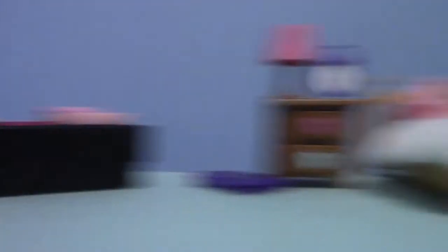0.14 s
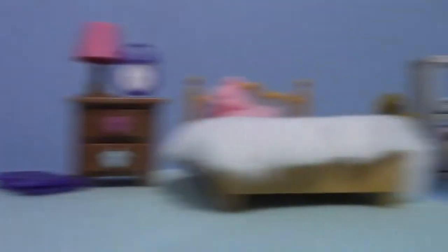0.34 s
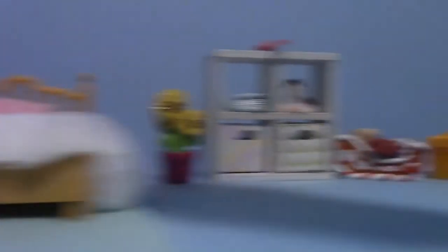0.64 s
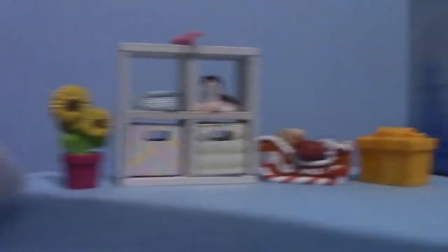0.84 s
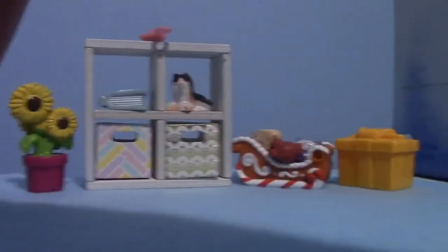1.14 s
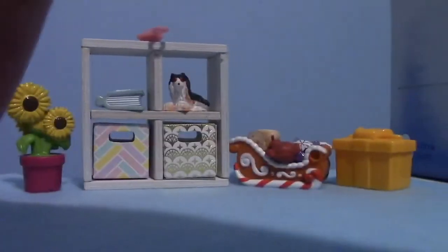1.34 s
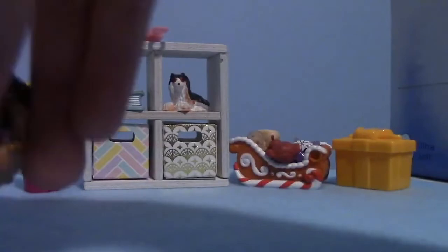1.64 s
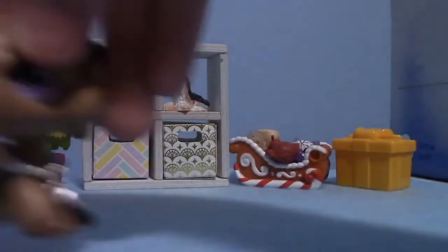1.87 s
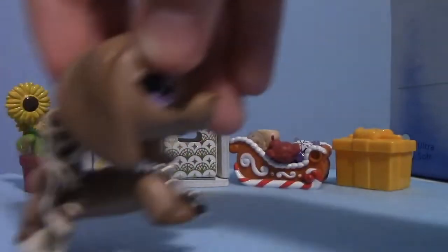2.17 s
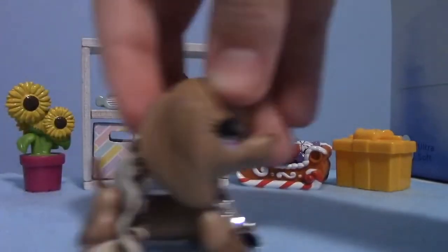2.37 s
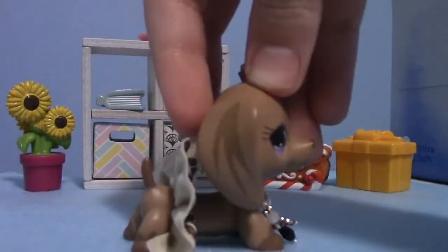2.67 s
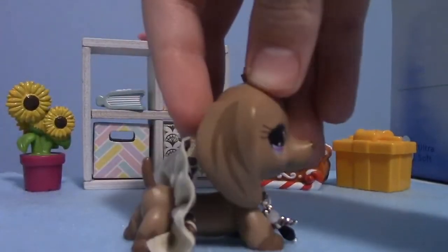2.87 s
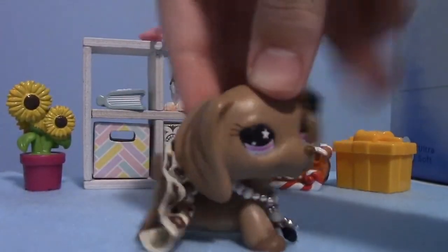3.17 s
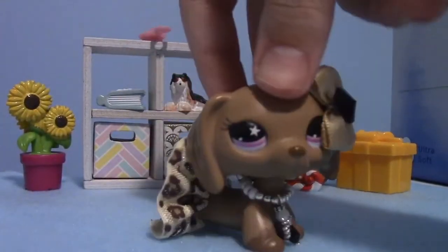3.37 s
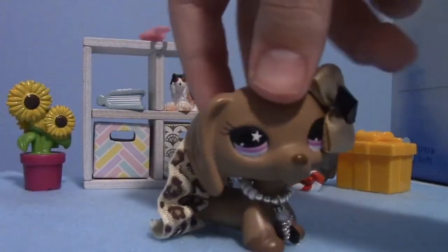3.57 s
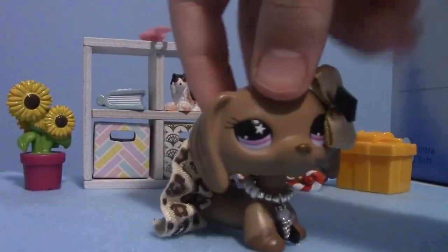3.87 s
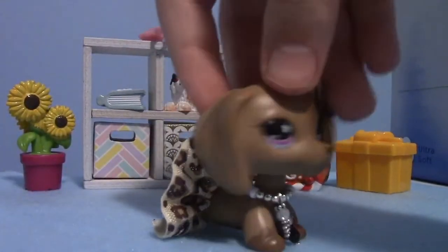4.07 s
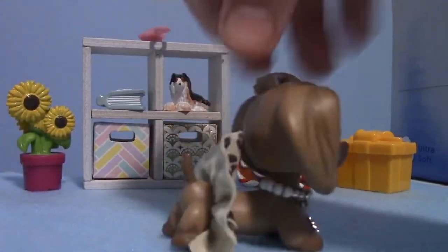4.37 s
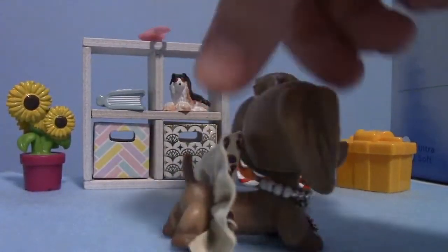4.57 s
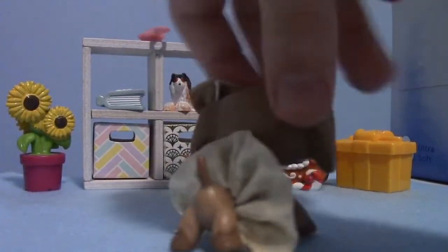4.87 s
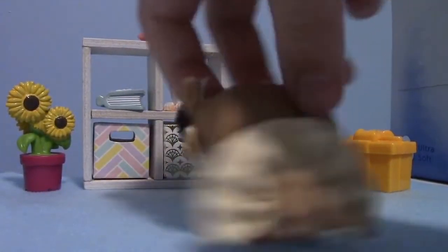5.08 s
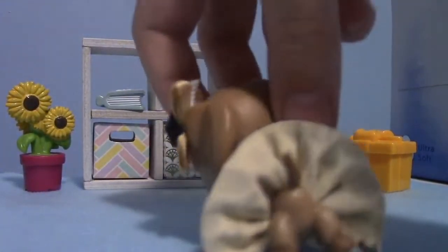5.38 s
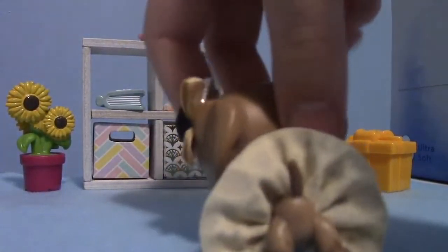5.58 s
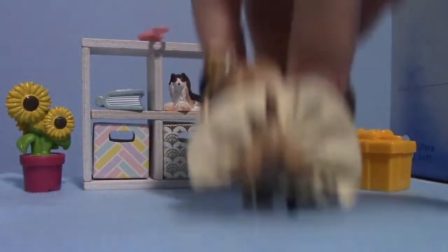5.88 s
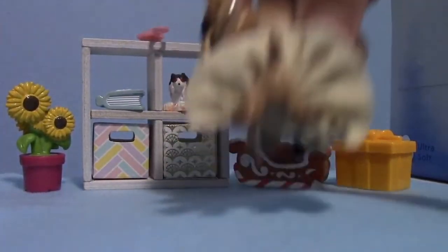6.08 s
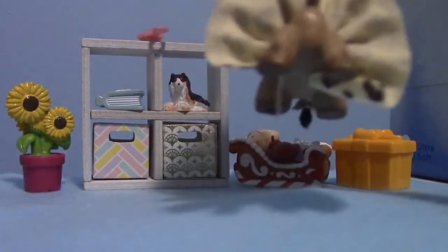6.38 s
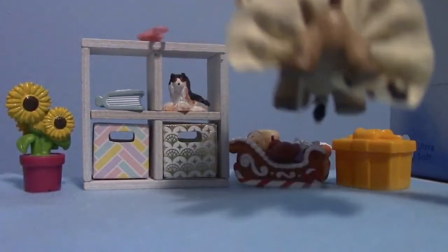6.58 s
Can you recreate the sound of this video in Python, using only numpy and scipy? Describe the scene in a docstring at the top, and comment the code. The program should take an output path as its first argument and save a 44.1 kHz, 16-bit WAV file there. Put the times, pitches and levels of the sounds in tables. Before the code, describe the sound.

Close up in a small, nearly echo-free room, a camera base scrapes along card: a resonant, rough hum with bright hiss, shifting in tone midway, then slowing to rest. Near quiet follows, with faint skin and fabric rubs, tiny bead clicks, and light hollow plastic taps as a toy dog is turned and hopped. Soft room noise and a very thin electronic whine stay behind.

```python
"""Card floor of a toy set in a small room: a small camera is slid across it, droning and hissing.
Then fingers walk a plastic toy dog about: skin and cloth skirt rub, bead necklace ticks, feet tap.
Drag and rubbing are random slip trains through resonances and filters; feet and beads are shaped
clicks plus damped modes; soft nudges are low damped tones. Behind: filtered-noise hush, sine whine."""
import sys
import numpy as np
from scipy import signal
from scipy.fft import rfft, irfft
from scipy.io import wavfile
from scipy.ndimage import uniform_filter1d

SR = 44100
rng = np.random.default_rng(int(sys.argv[2]) if len(sys.argv) > 2 else 0)


def store_pcm(level_fs):
    """Save levels as 16-bit WAV."""
    pcm = np.round(np.clip(level_fs, -1, 1) * 32767).astype(np.int16)
    wavfile.write(sys.argv[1], SR, np.atleast_2d(pcm).T)


N = 296335
T = np.arange(N) / SR


# camera slide, pushed off and slowing to rest: time_s, drone_db, hiss_db
SLIDE_LEVELS = [(0, -22, -33.5), (.072, -26, -34), (.125, -14.5, -29.5), (.29, -16.5, -27.5),
                (.61, -16, -25), (.67, -21.5, -28.5), (.8, -23, -30), (.98, -37.5, -44), (1.06, -39, -44.5),
                (1.19, -56, -62), (1.36, -62, -67)]
# base catching on the card: start_s, length_s, drone_change_db, hiss_change_db
BASE_CATCHES = [(0.126, 0.039, 2.5, -1.5), (0.267, 0.054, -1, 3), (.517, .065, -2, 5)]
# low floor modes, relative levels: freq_hz, width_hz, slide_start_db, slide_end_db
DRONE_MODES = [(177.6, 7, -11, -2), (222, 17, -15, -1), (256.5, 11, -14, -10), (271.9, 10.6, 3, 1),
               (290.7, 20, -8, 6), (323.4, 29, -44, 4.5), (357, 8.1, -18, -9), (429.6, 11, -4, -26),
               (446, 5.8, 0, -24)]
# upper floor modes, relative levels: freq_hz, width_hz, slide_start_db, slide_end_db
RASP_MODES = [(505.2, 13, 5, 0.5), (528, 19, -16, 2.5), (600, 57, -14.5, -4), (810, 91, -15, -12.5),
              (879, 54, -13, -8.5), (958, 16, -11.5, -16), (1180, 34, -14.5, -31)]
# hiss spectrum, relative: freq_hz, density_db_per_hz
GRIT_SPECTRUM = [(590, -15.5), (1000, -10.5), (1100, -6.5), (1520, -4.5), (1770, -7), (2280, -1.5),
                 (2740, -2.5), (3230, -4), (3980, 0.5), (4310, -0.5), (6940, -7.5), (9600, -17.5),
                 (12500, -16), (14800, -25), (16000, -37)]
# housing resonances under the grit: freq_hz, width_hz, level_db
HOUSING_MODES = [(1750, 130, 3), (2010, 110, -2.5), (2750, 160, -0.5), (3880, 99, -3.5), (6750, 320, -3)]
# stereo side of the drag: freq_hz, side_re_mid_db
DRAG_SIDE_SPECTRUM = [(200, -55), (700, -20), (1300, -20), (2200, -4), (3000, -11), (4400, -76),
                      (9000, -54)]
RASP_START_DB, RASP_END_DB = -5, 1  # re hiss level
SHUDDER_RMS_DB, SHUDDER_BAND_HZ = 0.84, 28


def camera_drag():
    """Stick-slip of base on card: coarse slips shake floor modes, fine grit hisses."""
    coarse = slips(per_s=1500, spread_db=1.5)
    drone = cut(floor_modes(coarse, DRONE_MODES), 194, "high", order=5)
    drone = steadied(cut(drone, 485, "low", order=4))
    rasp = cut(floor_modes(coarse, RASP_MODES), 526, "high", order=5)
    rasp = steadied(cut(rasp, 1280, "low"))
    rumble = evened(cut(cut(coarse, 130, "low"), 68, "high", order=5))

    fine = slips(per_s=9000, spread_db=3.0) * amp(1.06 * wander(70))
    grit = evened(through(fine + resonate(fine, HOUSING_MODES), causal(GRIT_SPECTRUM)))

    push = level(SLIDE_LEVELS, index=1) * amp(SHUDDER_RMS_DB * wander(SHUDDER_BAND_HZ))
    hiss = level(SLIDE_LEVELS, index=2)
    for start_s, length_s, drone_db, hiss_db in BASE_CATCHES:
        catch = swell(start_s, length_s, rise=0.25, fall=0.66)
        push = push * amp(drone_db * catch)
        hiss = hiss * amp(hiss_db * catch)

    rasp_db = RASP_START_DB + (RASP_END_DB - RASP_START_DB) * travelled()
    low = push * (amp(-1.47) * drone + amp(-44) * rumble)
    high = hiss * (amp(rasp_db) * rasp + amp(0.48) * grit)
    mid = cut(low + high, 55, "high")
    # housing shakes the two microphone ports unequally
    scatter = rng.standard_normal(512)
    scattered = through(mid, scatter / np.linalg.norm(scatter))
    side = through(scattered, causal(DRAG_SIDE_SPECTRUM))
    return np.array([mid + side, mid - side])


def floor_modes(x, modes):
    """The spot reached by the camera decides how strongly each mode is shaken."""
    way = travelled()
    gains = [amp(start_db + (end_db - start_db) * way) for _, _, start_db, end_db in modes]
    sound, power = 0, 0
    for gain, (freq_hz, width_hz, _, _) in zip(gains, modes):
        sound = sound + gain * resonate(x, [(freq_hz, width_hz, 0)])
        power = power + gain ** 2 * width_hz
    return sound / np.sqrt(power)


def travelled(cross_s=0.55, span_s=0.038):
    """Camera crossing from the first part of the floor (0) to the second (1)."""
    return .5 + .5 * np.tanh((T - cross_s) / (2 * span_s))


def swell(start_s, length_s, rise, fall):
    """One catch of the base: builds, holds, lets go; rise and fall are shares of its length."""
    u = (T - start_s) / length_s
    return np.sin(np.pi / 2 * np.clip(np.minimum(u / rise, (1 - u) / fall), 0, 1))


# feet meeting the floor:
# time_s, click_db, click_centre_hz, top_treble_re_click_db, thump_db, knock_db, knock_pitch_factor
FOOT_TAPS = [ (1.9541, -48, 3600, -20, -59, -39, 2.04), (2.257, -50, 4300, -21, -63, -43, 1.9),
             (2.4230, -44, 4400, -10, -48, -42, 1.02), (5.0136, -30.5, 3980, -13, -48, -34, 1),
             (5.0308, -30, 4130, -21, -49, -39.5, 1.56), (5.0370, -30.5, 5000, -8, -40, -34.5, 1.2),
             (5.0420, -36, 6900, -7, -62, -34.5, 0.92), (5.6003, -41, 2700, -27, -47, -41.5, 2),
             (5.7367, -38, 5260, -27, -46, -40.5, 1.2), (6.0422, -33.5, 4160, -18, -35, -33.5, 0.99),
             (6.0502, -41, 3900, -23, -46, -39.5, 1.06), (6.0582, -40, 5800, -29, -38, -40, 0.63),
             (6.0852, -42, 4400, -21, -39.5, -51, 0.69), (6.1573, -28.5, 5050, -23, -37, -34, 0.89),
             (6.2385, -40.5, 4600, -20, -41, -43.5, 1.04), (6.5595, -30, 5800, -24, -27.5, -31, .85), ]
# hollow toy's knock, before the pitch factor and detune: freq_hz, level_db, t60_s
TOY_KNOCK = [(611, -0.5, 0.027), (795, -6, 0.023), (1230, -3, 0.0068), (1500, 1, 0.0027),
             (2920, -3, 0.0073)]
# card floor flexing under a foot, before detune: freq_hz, level_db, t60_s
FLOOR_THUMP = [(135, -12, 0.034), (263, 0.5, 0.037), (337, 1, 0.026)]


def feet():
    """Each tap: click and knock of the toy, then a thump as the floor gives."""
    out = np.zeros(N)
    for time_s, click_db, centre_hz, top_db, thump_db, knock_db, pitch in FOOT_TAPS:
        shell = [(hz * pitch, db, t60_s / max(pitch, 1)) for hz, db, t60_s in TOY_KNOCK]
        add(out, time_s, -amp(click_db) * click(centre_hz, top_db))
        add(out, time_s, -amp(knock_db) * burst(ring(shell), .005))
        add(out, time_s + .0009, amp(thump_db) * burst(ring(FLOOR_THUMP), .008))
    return out


# plastic contact spectrum, relative, before tilt: freq_hz, level_db
CLICK_SPECTRUM = [(300, -20), (1000, -16), (1500, -8), (2100, -4.5), (3050, 4), (4200, -1), (5400, 2.5),
                  (7400, 2), (9500, -6.5), (11000, -20), (16000, -28)]


def click(centre_hz, top_db, tilt_db_per_octave=8, chatter=0.13, chatter_s=0.00076, split_hz=10200):
    """Plastic contact with brief decaying chatter: the harder the spot, the brighter."""
    snap = causal(CLICK_SPECTRUM, tilt_db_per_octave * np.log2(centre_hz / 4800))
    t = np.arange(len(snap)) / SR
    force = (t == 0) + chatter * rng.standard_normal(len(t)) * np.exp(-t / chatter_s)
    x = signal.fftconvolve(force, snap)[:len(t)]
    body = cut(x, split_hz, "low", order=8)
    top = cut(x, split_hz, "high", order=6)
    return burst(body, 0.0018) + amp(top_db) * burst(top, 0.0051)


# beads and fingernails on the plastic: time_s, click_db, centre_hz
BEAD_TICKS = [(1.6455, -51.5, 3500), (1.6918, -50, 3900), (1.7352, -48, 4500), (1.7845, -43, 3800),
              (3.2488, -51, 7000), (4.21, -44.5, 4500), (4.709, -43.5, 5100), (4.7287, -40.5, 4530),
              (4.8073, -40.5, 3900), (4.8164, -40.5, 4800), (4.8702, -44, 5300), (4.9152, -41.5, 7660),
              (5.2274, -49, 3900), (5.6173, -43.5, 6340), (6.1162, -44, 4600), (6.4734, -48, 4560),
              (6.6056, -50.5, 6300)]
TICK_TOP_DB, TICK_TOP_DB_PER_OCTAVE = -20, 16  # top treble re click, at 4800 Hz centre; its slope


def beads():
    """Tiny hard contacts: a click and a very short toy knock."""
    out = np.zeros(N)
    for time_s, level_db, centre_hz in BEAD_TICKS:
        top_db = TICK_TOP_DB + TICK_TOP_DB_PER_OCTAVE * np.log2(centre_hz / 4800)
        knock = burst(ring(TOY_KNOCK), 0.0027)
        add(out, time_s, amp(level_db) * (click(centre_hz, top_db) + amp(-2) * knock))
    return out


# toy nudged softly against the floor: time_s, level_db, centre_hz (before detune)
SOFT_NUDGES = [(4.078, -37.5, 497), (4.417, -38.5, 380), (5.346, -39.5, 500), (5.762, -35.5, 380)]


def nudges(t60_s=0.032, soft_s=0.0053):
    """Soft contacts swell and ring low, with no click."""
    out = np.zeros(N)
    for time_s, level_db, hz in SOFT_NUDGES:
        tone = ring([(hz, 0, t60_s), (hz * 1.306, -4, t60_s)])
        tone *= 1 - np.exp(-np.arange(len(tone)) / SR / soft_s)
        add(out, time_s + 0.0015, amp(level_db + 0.5) * tone / abs(tone).max())
    return out


# strokes of fingers and cloth on the toy: start_s, length_s, level_db
RUB_STROKES = [(1.252, 0.16, -63.5), (1.582, 0.21, -62), (1.922, 0.23, -58), (2.242, 0.088, -55),
               (2.35, 0.12, -53.5), (2.489, 0.041, -56.5), (3.002, 0.088, -62), (3.1, 0.12, -51),
               (3.284, 0.075, -54), (3.72, 0.057, -66), (4.06, 0.064, -55), (4.15, .02, -57),
               (4.185, 0.088, -50), (4.617, .02, -58.5), (4.66, .21, -51), (4.92, .03, -60),
               (4.995, 0.097, -49), (5.173, .22, -64), (5.46, 0.13, -67), (5.59, 0.13, -62),
               (5.728, 0.051, -53), (5.843, .12, -62.5), (6.023, 0.063, -57), (6.686, 0.018, -61)]
# rubbing spectrum, relative: freq_hz, density_db_per_hz
RUB_SPECTRUM = [(1350, -64), (2300, -3), (2770, 0), (4440, -2.5), (4890, -2.5), (6090, -3), (12700, -15.5),
                (14400, -21), (16000, -26)]


def rubbing():
    """Skin and cloth shed fine grains and a few snags, heard direct and through the hollow toy."""
    grains = slips(per_s=5000, spread_db=1.0) * amp(2.16 * wander(63))
    snags = slips(per_s=140, spread_db=3.5)
    friction = evened(grains) + amp(-5.0) * snags
    fizz = evened(through(friction, causal(RUB_SPECTRUM)))
    hollow = evened(through(friction, ring(TOY_KNOCK)))
    strokes = sum(amp(level_db) * stroke(start_s, length_s) for start_s, length_s, level_db in RUB_STROKES)
    return strokes * (fizz + amp(-2.5) * hollow)


def stroke(start_s, length_s, rise=0.12, fall=0.31):
    """A finger gathers speed, holds, eases to a light touch; rise and fall are shares of length."""
    u = (T - start_s) / length_s
    rising, falling = u / rise, (1 - u) / fall
    onset = (1 + rising / np.hypot(1, rising)) / 2
    release = (1 + falling / np.hypot(1, falling)) / 2
    return onset * release


def room(x, t60_s=0.094, size=12000):
    """Short reverberant tail: decaying noise, different on each side."""
    t = np.arange(size) / SR
    noise = cut(rng.standard_normal((2, size)), 2300, "low", order=1)
    tails = noise * amp(-60 * t / t60_s) * (t > .003)
    return np.array([through(x, tail / np.linalg.norm(tail)) for tail in tails])


# room hush spectrum, relative: freq_hz, density_db_per_hz
HUSH_SPECTRUM = [(20, -37), (50, -24), (100, -12), (160, -4.5), (280, -0.5), (400, 1), (620, -3.5),
                 (900, -5), (1250, -11), (1650, -8), (2200, -16), (3000, -22.5), (6500, -28.5),
                 (10000, -34), (16000, -42)]
# stereo correlation of the hush: freq_hz, left_right_likeness
HUSH_LIKENESS = [(60, 0.61), (130, 0.89), (290, 0.97), (640, 0.89), (1410, 0.94), (3100, 0.9), (6820, 1),
                 (15000, 0.94)]
# narrow whirr in the hush, one row: freq_hz, width_hz, level_db
HUSH_WHIRR = (1829, 153, -60)
HUSH_DB = -51


def hush():
    """Steady room noise, spectrally shaped and partly correlated, with a narrow whirr."""
    hz = np.fft.rfftfreq(N, 1 / SR)
    mid, side = rfft(rng.standard_normal((2, N)))
    same = np.clip(read(HUSH_LIKENESS, hz), -1, 1)
    pair = np.sqrt(1 + same) * mid + np.array([[1], [-1]]) * np.sqrt(1 - same) * side
    air = evened(irfft(pair * amp(read(HUSH_SPECTRUM, hz)), N))
    whirr_hz, width_hz, whirr_db = HUSH_WHIRR
    whirr = evened(irfft(pair / (1 + ((hz - whirr_hz) / width_hz * 2) ** 2), N))
    return amp(HUSH_DB) * air + amp(whirr_db) * whirr


# camera whine tones, lowest first: freq_hz, rms_db (lowest before swells)
WHINE_TONES = [(5565, -81), (11000, -89), (13000, -90)]
# centres of the lowest tone's swells: time_s
WHINE_SWELL_TIMES = [2.89, 3.02, 3.49, 3.63, 3.76, 4.36]


def whine(swell_db=11, half_swell_s=.033):
    """Thin electronic whine: phase-wandering sines; the lowest swells in short pulses."""
    tones = []
    for hz, level_db in WHINE_TONES:
        phase = 2 * np.pi * hz * T + hz / 9000 * wander(60)
        tones.append(amp(level_db) * evened(np.sin(phase)))
    low, *high = tones
    pulses = sum(1. * (abs(T - time_s) < half_swell_s) for time_s in WHINE_SWELL_TIMES)
    swelling = uniform_filter1d(pulses, size=300)
    return low * amp(swell_db * swelling) + sum(high)


def slips(per_s, spread_db):
    """Friction: a random train of tiny slips, a few of them large; rms 1."""
    size = amp(spread_db * np.minimum(rng.exponential(1, N), 4))
    sign = rng.choice([-1., 1.], N)
    return evened(size * sign * (rng.random(N) < per_s / SR))


def ring(modes, detune=0.096, size=2048):
    """Damped modes after one blow, each randomly detuned as spots ring differently."""
    t = np.arange(size) / SR
    out = np.zeros(size)
    for hz, level_db, t60_s in modes:
        mode_hz = hz * (1 + detune * rng.standard_normal())
        out += amp(level_db - 60 * t / t60_s) * np.sin(2 * np.pi * mode_hz * t)
    return out


def resonate(x, modes):
    """Sum of fixed resonances."""
    return sum(amp(db) * signal.lfilter(*signal.iirpeak(hz, hz / width_hz, SR), x)
               for hz, width_hz, db in modes)


def causal(points, tilt_db_per_octave=0, size=2048):
    """Minimum-phase impulse of a given spectrum, tilted above 2 kHz."""
    hz = np.fft.rfftfreq(size, 1 / SR)
    db = read(points, hz) + tilt_db_per_octave * np.log2(np.maximum(hz, 2000) / 2000)
    cepstrum = irfft(np.log(amp(np.maximum(db, -100))))
    # fold the cepstrum to its causal half
    cepstrum[1:size // 2] *= 2
    cepstrum[size // 2 + 1:] = 0
    return irfft(np.exp(rfft(cepstrum)))


def wander(band_hz):
    """Slow random drift of rms 1: noise under a Gaussian low-pass."""
    hz = np.fft.rfftfreq(N, 1 / SR)
    return evened(irfft(rfft(rng.standard_normal(N)) * np.exp(-(hz / band_hz) ** 2), N))


def steadied(x, span_s=0.064):
    """Flattens slow level changes, leaving surges to the level curves."""
    size = max(int(span_s * SR), 1)
    power = uniform_filter1d(uniform_filter1d(evened(x) ** 2, size), size)
    return evened(x / np.sqrt(abs(power) + 1e-3))


def level(rows, index=1):
    """One dB column of a curve as gain, fading out beyond its ends."""
    rows = np.array(rows)
    outside_s = np.maximum(rows[0, 0] - T, 0) + np.maximum(T - rows[-1, 0], 0)
    return amp(np.interp(T, rows[:, 0], rows[:, index])) * np.exp(-outside_s / 0.059)


def burst(x, span_s):
    """Scales a short sound to the energy of rms 1 held for span_s."""
    return x * np.sqrt(span_s * SR / np.sum(x ** 2))


def evened(x):
    """Scales to rms 1."""
    return x / np.sqrt(np.mean(x ** 2) + 1e-20)


def read(points, hz):
    """Interpolates a spectrum table on a log-frequency axis."""
    f, value = np.transpose(points)
    return np.interp(np.log(hz + 1), np.log(f + 1), value)


def through(x, impulse):
    """Convolves, cut to N samples."""
    return signal.oaconvolve(x, impulse)[:N]


def cut(x, hz, kind, order=2):
    """Butterworth high-pass or low-pass."""
    return signal.sosfilt(signal.butter(order, hz, kind, fs=SR, output="sos"), x)


def add(mix, time_s, sound):
    """Lays a sound into the mix."""
    part = mix[round(time_s * SR):][:len(sound)]
    part += sound[:len(part)]


def amp(db):
    """Decibels to gain."""
    return 10 ** (np.asarray(db) / 20)


def scene():
    """Everything close and near the middle; the small toy radiates no deep bass."""
    toy = cut(feet() + nudges() + beads() + rubbing(), 110, "high")
    balance = amp([[.15], [-.15]])  # left, right
    return toy + amp(-24) * room(toy) + (camera_drag() + hush()) * balance + whine()


def record(dry, edge_hz=16150):
    """Recorder's band limit: linear-phase low-pass."""
    lowpass = signal.firwin(511, edge_hz, window=("kaiser", 9), fs=SR)
    return signal.oaconvolve(dry, lowpass[None], "same")


dry = scene()
out = record(dry)
store_pcm(out)
```